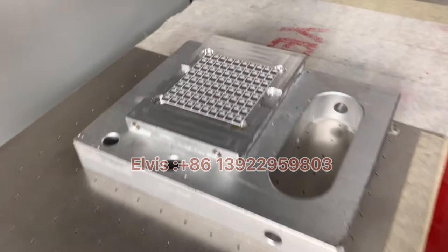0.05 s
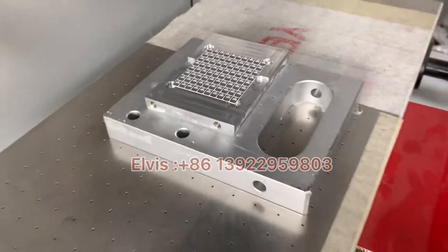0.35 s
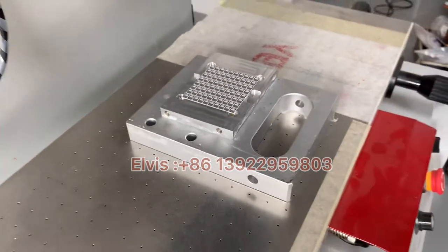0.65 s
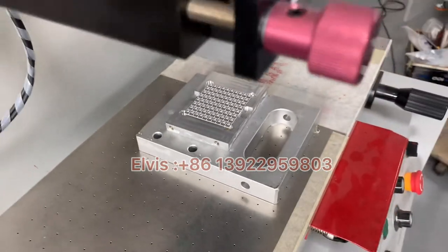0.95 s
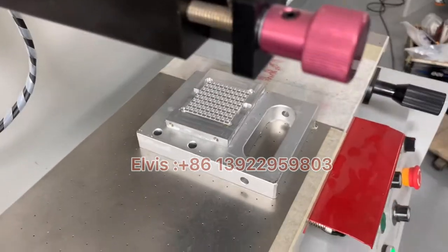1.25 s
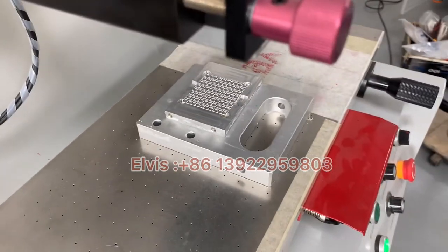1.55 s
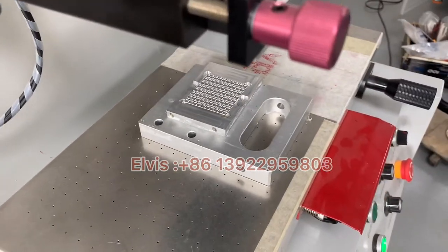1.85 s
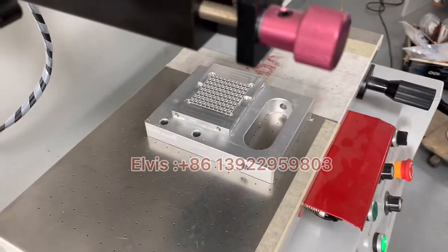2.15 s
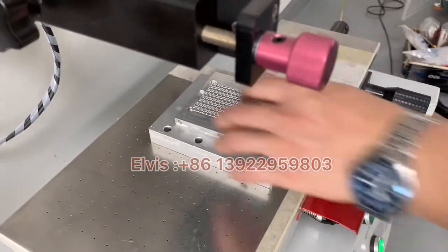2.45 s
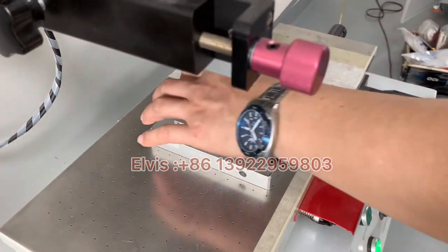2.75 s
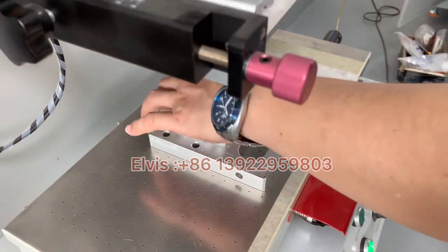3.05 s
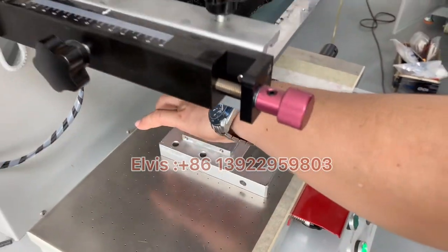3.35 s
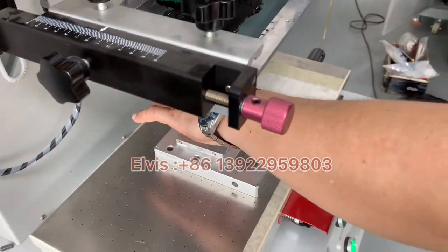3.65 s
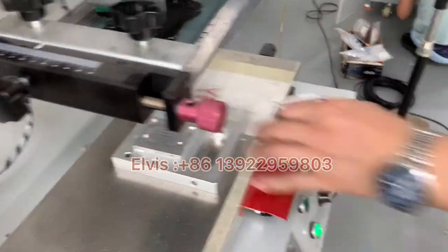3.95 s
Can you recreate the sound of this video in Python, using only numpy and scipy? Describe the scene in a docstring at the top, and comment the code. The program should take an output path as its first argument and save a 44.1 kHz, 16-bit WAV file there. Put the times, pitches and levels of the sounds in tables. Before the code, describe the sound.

A machine head slides with a low whoosh, then stops with a sharp metallic clank.

```python
"""A workshop: the print head of a screen printer slides along its rail. The bearings rush and ring
the frame, the arm drones, and dull thumps follow as it slows. A steel stop clanks, rebounds and rings
through the room. Later a softer rumble swells and a few small metal ticks sound,
over a steady machine hum."""
import sys
import numpy as np
from scipy import signal
from scipy.fft import rfft, irfft
from scipy.io import wavfile

SR = 44100
rng = np.random.default_rng(int(sys.argv[2]) if len(sys.argv) > 2 else 0)


def inscribe(sig):
    """Save sig as 16-bit PCM at rate SR to the path in sys.argv[1].

    A 1-D sig is mono; a 2-D sig holds one channel per row.
    Samples are clipped to [-1, 1] before scaling.
    """
    pcm = np.round(np.clip(np.atleast_2d(sig).T, -1, 1) * 32767)
    wavfile.write(sys.argv[1], SR, pcm.astype(np.int16))


N = 176400
T, F = np.arange(N) / SR, np.arange(N // 2 + 1) * SR / N
MIC_SPACING_M, SOUND_M_S = 0.17, 343


def carriage():
    """Speed drives the ringing frame, the fluttering roll of the bearings and the hiss of the rail."""
    # Each row: time in seconds, speed in dB re full speed.
    speed_curve = [(0, -12.5), (.1, -9), (.19, -0.5), (.32, 0), (.45, -3), (.6, -7.5), (.8, -13.5),
                   (1.0, -21.5), (1.2, -26.5), (1.32, -59)]
    # Each row: frame resonance in Hz, relative level in dB.
    frame_modes = [(126, -3.5), (143, -2), (168, -0.5), (207, 0), (223, -1.5), (248, -4.5), (297, -12.5),
                   (394, -8.5), (421, -9.5), (567, -14.5), (646, -11.5), (871, -18.5), (1171, -20.5)]
    # Each row of both: frequency in Hz, relative noise density in dB.
    roll_spectrum = [(30, -20), (100, -20), (130, 0.5), (240, 4), (285, -8), (460, -1), (530, -11.5),
                     (680, -5.5), (760, -8.5), (930, -9.5), (1150, -15), (1700, -20), (2300, -23),
                     (4000, -57)]
    hiss_spectrum = [(400, -18), (1000, 3.5), (2200, 1), (3500, -3.5), (5000, -11.5), (7500, -16.5),
                     (9000, -29), (11500, -18.5), (13000, -42), (16000, -44)]
    speed_db = curve(speed_curve, fall_db_s=60)
    frame = tones(frame_modes, wander_hz=3.04, swing_db=3.5) * undb(-22 + 0.95 * speed_db)
    body = ripple()
    flutter_db = 1.1 * walk(rate_hz=30)
    roll = noise(colour(roll_spectrum) * body) * undb(-16.5 + 1.06 * speed_db + flutter_db)
    hiss = noise(colour(hiss_spectrum) * body) * undb(-29.5 + 1.91 * speed_db + flutter_db / 2)
    return frame + roll + hiss


def arm_drone():
    """The arm drones on one low, slightly wobbling tone."""
    # Each row: time in seconds, level in dB.
    level_curve = [(0, -39.5), (.14, -23.5), (.28, -24.5), (.5, -23), (.64, -25), (.74, -27), (.95, -39)]
    pitch_hz = 72.5 * (1 + 0.011 * walk(rate_hz=4.4))
    phase = 2 * np.pi * np.cumsum(pitch_hz) / SR
    pan_db, spread_rad = 0.5, 0.5
    sides = np.array([[0.5], [-0.5]])
    level_db = curve(level_curve, fall_db_s=60) + sides * pan_db
    return np.sqrt(2) * np.sin(phase - sides * spread_rad) * undb(level_db)


def thumps():
    """The slowing head thumps: each time a few low swings and a muffled knock."""
    # Each row: start in seconds, envelope peak in dB, pitch in Hz.
    hits = [(0.597, -19, 84), (0.657, -15, 68.4), (.757, -13.5, 73), (0.791, -13.5, 58.6), (0.829, -20, 45),
            (0.869, -14.5, 62), (.979, -18, 97), (1.031, -14.5, 65), (1.064, -20.5, 57.3), (1.111, -14, 91),
            (1.141, -21.5, 62), (1.223, -27, 62.4)]
    # Each row: frequency in Hz, relative noise density in dB.
    knock_spectrum = [(40, -19), (110, 0.5), (220, 0), (400, -13), (900, -29), (3000, -38)]
    rise_s, decay_s, scatter_rad = 0.0042, 0.017, 0.3
    swings, knock_env = 0, 0
    for start_s, db, hz in hits:
        age = np.maximum(T - start_s, 0)
        env = (1 - np.exp(-(age / rise_s) ** 2)) * np.exp(-age / decay_s)
        env *= undb(db) / env.max()
        mic_phase = scatter_rad * rng.standard_normal((2, 1))
        swings += env * np.sin(2 * np.pi * hz * age + mic_phase)
        knock_env += env
    return swings + undb(-11) * knock_env * noise(colour(knock_spectrum))


def stop_clank(room):
    """Every blow on the stop cracks, rings its steel modes and sets loose parts chattering."""
    # First touch, main blow, rebounds. Each row: start in seconds, relative strength in dB.
    blows = [(1.298, -11), (1.3045, 1.5), (1.3071, -3.5), (1.3093, -3), (1.3140, -6.5), (1.3315, -15),
             (1.357, -12), (1.3648, -11.5), (1.3705, -9), (1.379, -12), (1.413, -17)]
    # Beating clusters. Each row: frequency in Hz, relative level in dB, T60 in seconds.
    steel_modes = [(1794, -4, .25), (1810, -8, 0.96), (1817, 2.5, 0.041), (1857, -1.5, .06),
                   (2230, -5, .05), (2270, -8, 0.14), (2363, -5.5, .05), (2430, -7.5, .09),
                   (2651, -11, 0.063), (3245, -4, 0.039), (3290, -7.5, 0.23), (3343, 1, 0.052),
                   (3785, 3, 0.035), (4100, -6, .045), (4265, -6, 0.046), (5260, -8, 0.02),
                   (6180, -3.5, .01)]
    # Each row of both: frequency in Hz, relative noise density in dB.
    crack_spectrum = [(100, -3), (220, 6), (420, 2.5), (750, 0.5), (1450, -4.5), (1800, 4.5), (2200, 1.5),
                      (2800, -0.5), (3350, -6), (4500, -9.5), (6800, -15.5), (9000, -28), (15000, -26)]
    chatter_spectrum = [(900, -17), (1700, 0), (2400, 5), (2900, -5), (3350, 2), (4300, -10), (7000, -17),
                        (9000, -26)]
    ring, age = np.zeros((2, N)), T[:SR]
    hz, mode_db, t60_s = np.array(steel_modes).T[:, :, None]
    for start_s, blow_db in blows:
        phase = rng.uniform(0, 2 * np.pi, (2,) + hz.shape)
        pitch_hz = hz * (1 + 0.003 * rng.standard_normal(hz.shape))  # each contact shifts the modes
        env = undb(mode_db + blow_db - 22) * np.exp(-np.log(1000) * age / t60_s)
        modes = env * np.sin(2 * np.pi * pitch_hz * age + phase)
        start = int(start_s * SR)
        ring[:, start:start + SR] += modes.sum(axis=1)
    crack = noise(colour(crack_spectrum)) * bursts(blows, decay_s=0.0042) * undb(-22)
    chatter = noise(colour(chatter_spectrum)) * bursts(blows, decay_s=0.028)
    chatter *= undb(-43.5 + 3 * walk(rate_hz=220))
    contact = crack + chatter
    room_send = undb(-4.5) * ring[0] + undb(3) * contact[0]
    return ring + contact + echo(room_send, room)


def rumble():
    """A low rush swells twice; a soft boom of two beating resonances leads into the second swell."""
    # Each row: resonance in Hz, relative level in dB.
    boom_modes = [(178, -0.27), (222, -0.77)]
    # Each row of both: time in seconds, gain in dB.
    boom_curve = [(2.68, -71), (2.85, -49.5), (2.96, -41), (3.03, -35), (3.13, -38), (3.25, -51),
                  (3.45, -54), (3.75, -56), (4, -69)]
    rush_curve = [(1.4, -65), (2.05, -46.5), (2.4, -51), (2.72, -56), (3.0, -40), (3.27, -35.5), (3.5, -38),
                  (3.75, -47.5), (4, -62)]
    # Each row: frequency in Hz, relative noise density in dB.
    rush_spectrum = [(70, -24), (130, -7.5), (200, -4), (260, 2), (320, -11), (378, 1), (440, -12.5),
                     (600, -9.5), (1200, -14.5), (2500, -26.5), (6000, -67)]
    boom = tones(boom_modes, wander_hz=6.12, swing_db=2) * undb(curve(boom_curve))
    rush = noise(colour(rush_spectrum) * ripple()) * undb(curve(rush_curve))
    return boom + rush


def ticks(room):
    """Tiny bright contacts, each with a brief ring, while a hand rests on the metal fixture."""
    # Each row: start in seconds, level in dB.
    contacts = [(3.395, -37), (3.519, -37), (3.5265, -25), (3.536, -36), (3.551, -44)]
    # Each row of both: frequency in Hz, relative noise density in dB.
    click_spectrum = [(1500, -25), (3100, -16), (3800, 1), (5500, -4), (7000, 1), (9000, -12), (11000, 10),
                      (13000, -4), (16000, 0)]
    ring_spectrum = [(2800, -35), (3700, 0), (4100, -8), (4500, -1), (5600, -30)]
    click = noise(colour(click_spectrum)) * bursts(contacts, decay_s=0.0023)
    ring = noise(colour(ring_spectrum)) * bursts(contacts, decay_s=0.025) * undb(-22.5)
    direct = click + ring
    return direct + undb(-12) * echo(direct[0], room)


def hum_and_air():
    """Wavering machine hum over the faintly flickering air of the workshop."""
    # Each row: frequency in Hz, level in dB.
    hum_lines = [(71, -57), (148, -60), (173, -56), (297, -54), (350, -61), (403, -59), (570, -60.5),
                 (1077, -70)]
    # Each row: frequency in Hz, relative noise density in dB.
    air_spectrum = [(20, -36), (35, -10), (52, 1.5), (100, -4.5), (170, 1.5), (260, -3), (450, -5.5),
                    (800, -8.5), (2000, -12.5), (4000, -20), (7500, -26), (11000, -24), (15500, -29.5)]
    air = noise(colour(air_spectrum) * np.sqrt(ripple())) * undb(-40 + 0.59 * walk(rate_hz=4.1))
    return tones(hum_lines, wander_hz=1.43, swing_db=3.5) + air


def workshop_response():
    """Impulse response of the room: a dense tail whose treble dies first."""
    # Each row: frequency in Hz, T60 in seconds.
    decay_times = [(200, 1.33), (1000, 1.47), (2000, 1.3), (3300, 1.19), (6000, 0.91), (14000, 0.78)]
    rise_s = 0.003
    hz, t60s = np.array(decay_times).T
    white, tail = rfft(noise(1)), 0
    for weights, t60_s in zip(np.eye(len(hz)), t60s):
        band = irfft(white * np.interp(np.log(F + 1), np.log(hz), weights), N)
        tail += band * np.exp(-np.log(1000) * T / t60_s)
    tail *= 1 - np.exp(-T / rise_s)
    return tail / np.sqrt(np.sum(tail ** 2) / 2)


def echo(mono, room):
    """Stereo reverberation of a mono sound."""
    return signal.fftconvolve(mono[None], room, axes=1)[:, :N]


def tones(rows, wander_hz, swing_db):
    """Wavering sines from (Hz, dB rms) rows; higher ones differ more between the microphones."""
    total = 0
    for hz, db in rows:
        phase = 2 * np.pi * np.cumsum(hz + wander_hz * walk(7.4)) / SR + rng.uniform(0, 2 * np.pi)
        apart_rad = np.pi * hz * MIC_SPACING_M / SOUND_M_S * walk(2.6) / 2
        amplitude = np.sqrt(2) * undb(db + swing_db * walk(9.2))
        total += amplitude * np.sin(phase + np.array([apart_rad, -apart_rad]))
    return total


def noise(gain):
    """Coloured noise of rms 1 at two spaced microphones, most alike in the bass."""
    mid, side = rfft(rng.standard_normal((2, N))) * gain
    coherence = 0.77 * np.sinc(2 * F * MIC_SPACING_M / SOUND_M_S)
    x = irfft(mid * np.sqrt(1 + coherence) + np.array([[1], [-1]]) * side * np.sqrt(1 - coherence), N)
    return x / x.std()


def colour(rows):
    """Gain per frequency from (Hz, dB) rows, rolled off beyond both ends."""
    hz, db = np.array(rows).T
    gain = undb(np.interp(np.log(F + 1), np.log(hz), db))
    return gain / np.hypot(1, (F / hz[-1] / 2) ** 2) * np.minimum(F / hz[0], 1)


def ripple(spacing_hz=14, depth_db=3):
    """Gain per frequency of the machine's many small resonances."""
    grid_hz = np.arange(0, SR / 2, spacing_hz)
    return undb(depth_db * np.interp(F, grid_hz, rng.standard_normal(SR)[:len(grid_hz)]))


def walk(rate_hz):
    """Smooth random drift of standard deviation 1."""
    x = irfft(rfft(rng.standard_normal(N)) / (1 + (F / rate_hz) ** 4), N)
    return x / x.std()


def bursts(rows, decay_s):
    """Envelope of sharp, decaying blows from (s, dB) rows."""
    return sum(undb(db) * (T >= at) * np.exp(-np.abs(T - at) / decay_s) for at, db in rows)


def curve(rows, fall_db_s=0):
    """Straight lines through (s, dB) rows, with an optional fall after the last."""
    return np.interp(T, *np.array(rows).T) - fall_db_s * np.maximum(T - rows[-1][0], 0)


def undb(db):
    """Decibels to gain."""
    return 10 ** (np.asarray(db) / 20)


def scene():
    """The machine in its workshop."""
    room = workshop_response()
    printer = carriage() + arm_drone() + thumps() + stop_clank(room)
    return printer + rumble() + ticks(room) + hum_and_air()


def record(dry):
    """Delays the left channel, thins the deep bass, rounds peaks and cuts the top."""
    lag_s, low_cut_hz, top_hz, ceiling = 0.0002, 26, 15900, 1.8
    x = np.array([np.roll(dry[0], int(lag_s * SR)), dry[1]])
    x = signal.sosfilt(signal.butter(4, low_cut_hz, "high", fs=SR, output="sos"), x)
    x = ceiling * np.tanh(x / ceiling)
    return signal.sosfilt(signal.ellip(10, .1, 80, top_hz, fs=SR, output="sos"), x)


dry = scene()
out = record(dry)
inscribe(out)
```